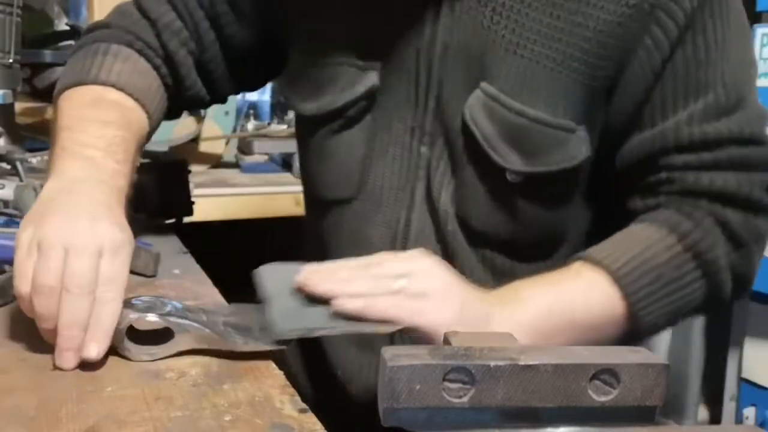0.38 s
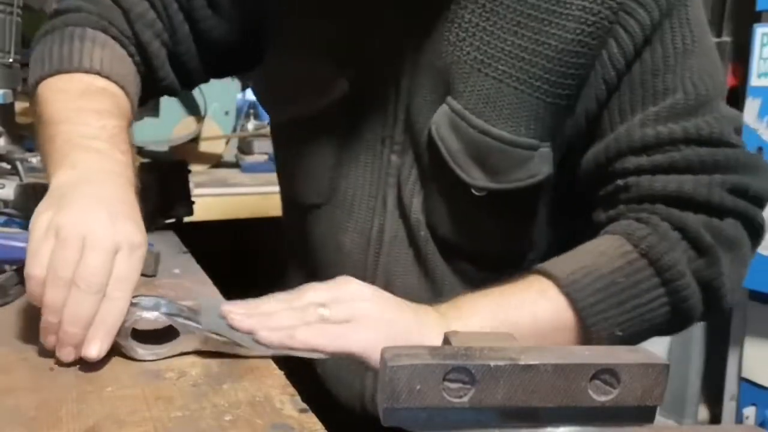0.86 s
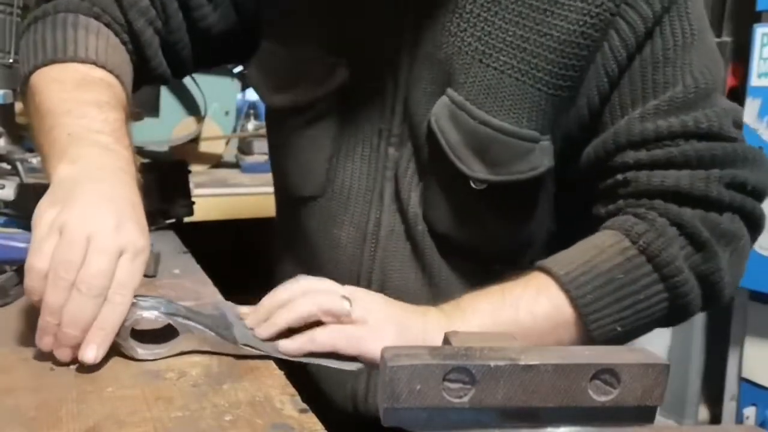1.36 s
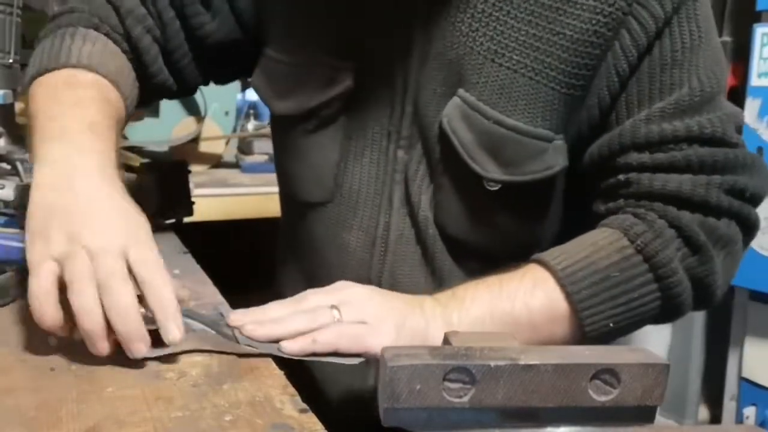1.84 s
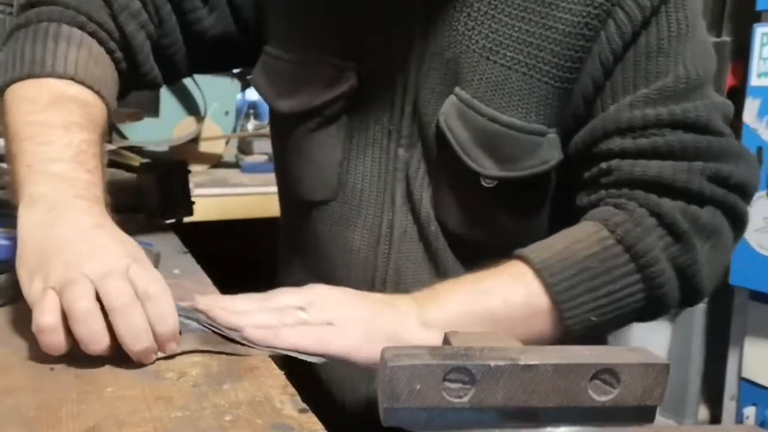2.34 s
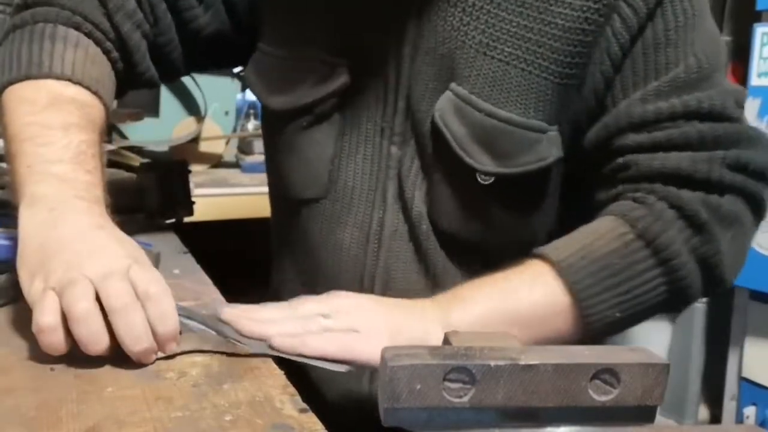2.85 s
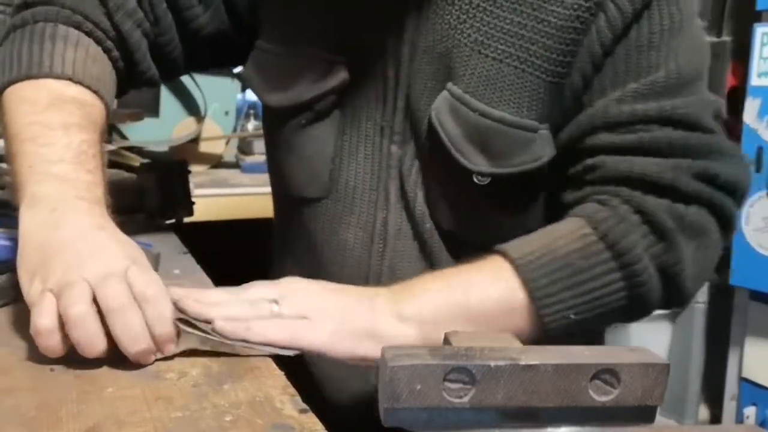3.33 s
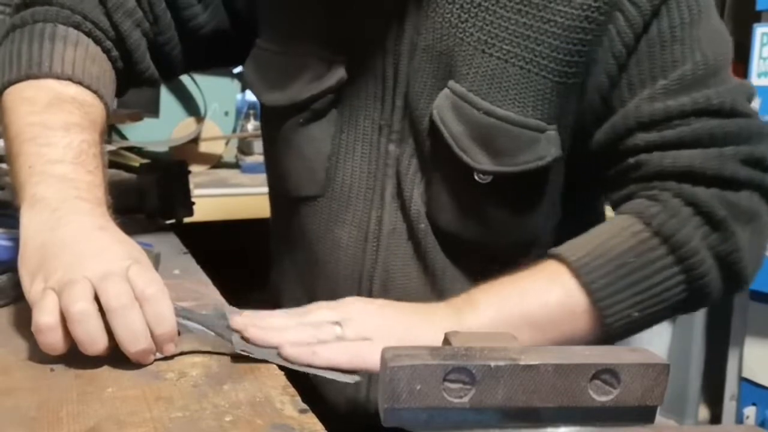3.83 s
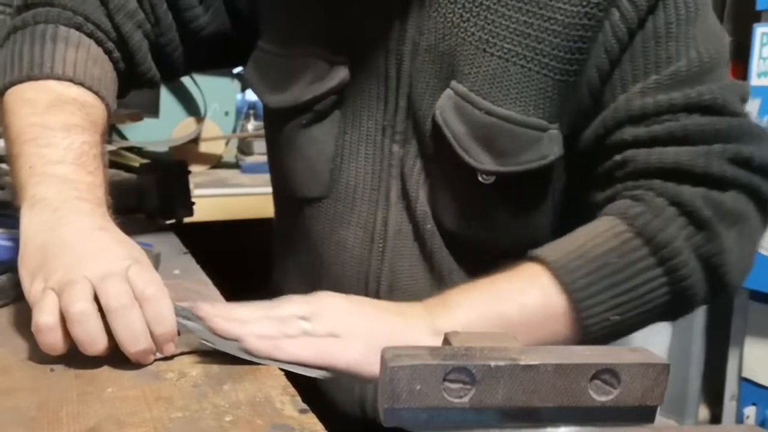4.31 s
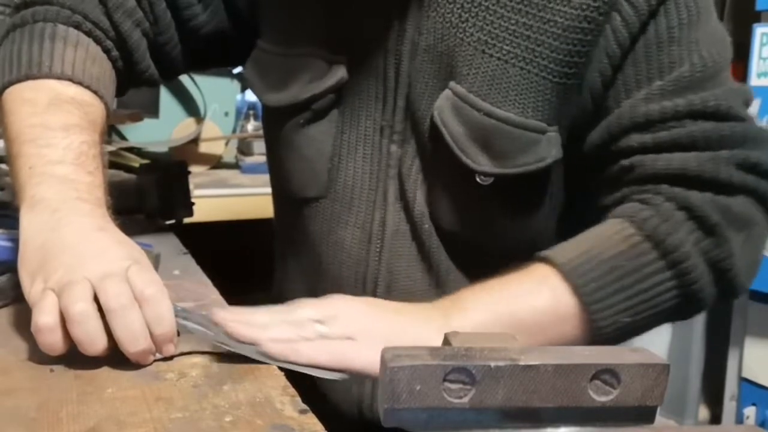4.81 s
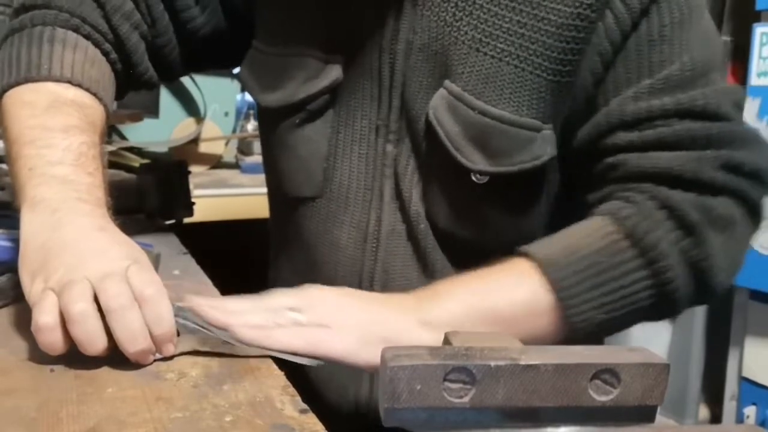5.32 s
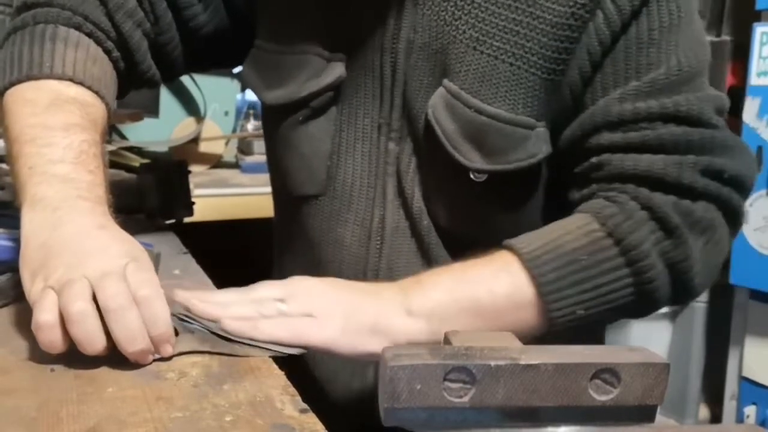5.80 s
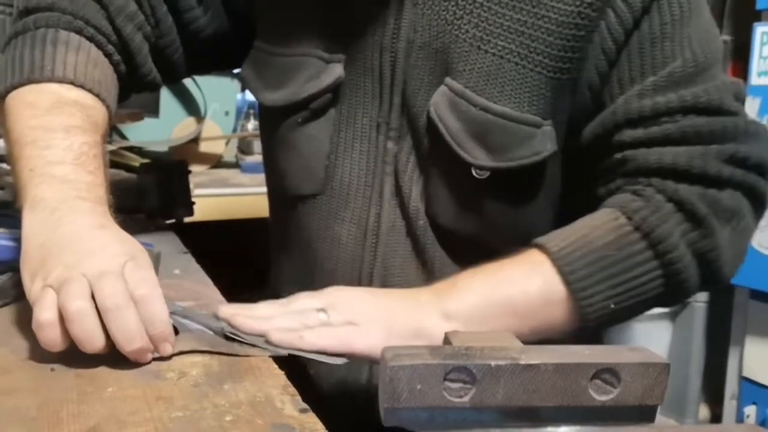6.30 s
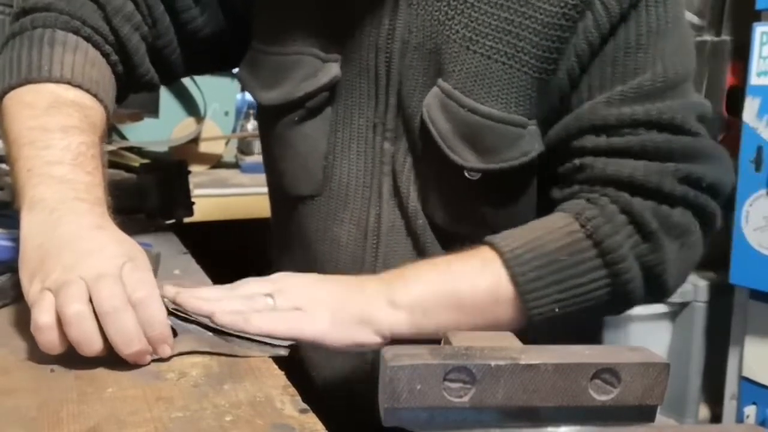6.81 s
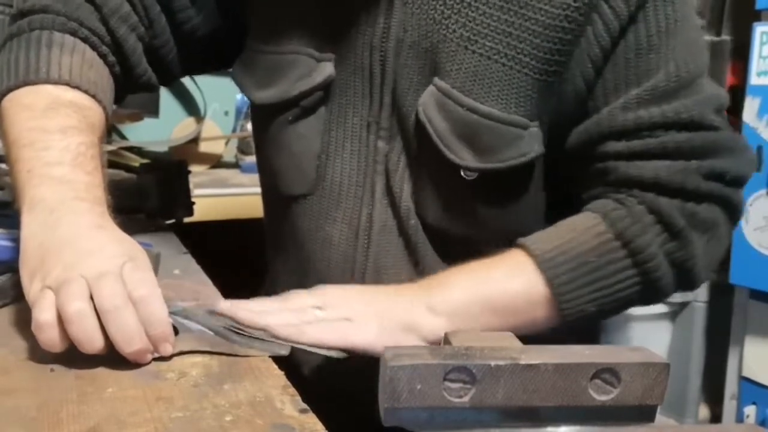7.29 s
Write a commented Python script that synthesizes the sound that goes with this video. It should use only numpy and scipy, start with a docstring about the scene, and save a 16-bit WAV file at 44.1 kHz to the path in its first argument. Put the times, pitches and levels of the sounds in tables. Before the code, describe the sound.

Close stereo sound in a small workshop with a short echo and barely audible air. At 0 s a light sandpaper brush fades with a soft knock; small scuffs follow around 0.5-0.75 s. From 0.8 to 1.5 s come four quick scratchy strokes on steel, each under 0.2 s. Rubbing stops; at 1.6-1.7 s two hard, woody knocks land close together, with a weaker tap just after and another knock at 2.05 s. From about 2.2 s the sanding runs steadily to the end at roughly 7.6 s, nearly six strokes a second, alternating push and pull, dipping at every turn. It combines bright gritty hiss, coarser scratch, damped metallic resonance and a low palm rasp, growing slightly fuller and less sharply separated. Moderate bench thuds recur irregularly, around 2.8, 3.1, 4.1, 4.5, 5.1, 5.5, 6.2 and 6.9 s, over a low wooden tremble.

```python
"""A light brush of sandpaper and a soft knock, a few quick strokes, a pause with hard knocks, then steady rubbing.
A palm rubs the sheet to and fro over a steel tool head on a wooden bench, close to a pair of microphone ports.
Random catches of grit are filtered into hiss, scratch, palm drag and ringing steel; each turn halts the paper.
The head knocks the bench: decaying modes boom and sway on the legs, and shaped noise trembles beneath.
A short decaying echo and faint airy noise place it all in a workshop."""
import sys
import numpy as np
from scipy import signal
from scipy.fft import rfft, irfft, next_fast_len
from scipy.io import wavfile
from scipy.ndimage import uniform_filter1d, map_coordinates

SR = 44100
rng = np.random.default_rng(int(sys.argv[2]) if len(sys.argv) > 2 else 0)


def linear_from_db(decibels):
    """Turn decibels (scalar or array-like) into linear amplitude factors; 0 gives 1."""
    return 10 ** (np.asarray(decibels, float) / 20)


def pcm_store(signal):
    """Save signal as 16-bit PCM."""
    levels = np.round(np.clip(np.atleast_2d(signal), -1, 1) * 32767)
    wavfile.write(sys.argv[1], SR, levels.astype(np.int16).T)


N = 337806
T = np.arange(N) / SR  # s


def unit(x):
    """Scales a sound to rms 1."""
    return x / np.sqrt(np.mean(x ** 2) + 1e-20)


def along(points, hz, axis=1):
    """Reads one column of a table on a log-frequency axis."""
    table = np.transpose(points)
    return np.interp(np.log(hz + 1), np.log(table[0] + 1), table[axis])


def curves(rows):
    """Draws each column after the time as a curve, one value per sample."""
    s, *columns = np.transpose(rows)
    return np.array([np.interp(T, s, column) for column in columns])


def wobble(rate):
    """A smooth random curve with rate knots a second."""
    knots = rng.standard_normal(int(N * rate / SR) + 4)
    return map_coordinates(knots, [T * rate])


def filtered(x, response):
    """Passes x through a complex response given as a function of frequency in Hz."""
    size = next_fast_len(N + SR // 2)
    hz = np.fft.rfftfreq(size, 1 / SR)
    return irfft(rfft(x, size) * response(hz), size)[..., :N]


def coloured(x, spectrum):
    """Shapes x by a table of hz and db, then scales it to rms 1: only the shape of the table counts."""
    return unit(filtered(x, lambda hz: linear_from_db(along(spectrum, hz))))


def sanding():
    """One stream of grit catches drives every layer of the rubbing, all under the same strokes."""
    grit_db, steel_db, scratch_db, dip_db, place = stroke_levels(
        sharp=2.26, reach=1.35, eager=0.93, steel_dip=0.46, edge_db=1.0)
    press_db = .35 * wobble(30) + .8 * wobble(150)  # the palm's pressure flutters
    grains = patchy(catches(rate=8000, spread_db=2.5, smooth=1.1), patchy_db=1.5)
    layers = grit(grains, grit_db + press_db) + scratch(grains, scratch_db + press_db)
    layers = layers + steel(grains, steel_db + press_db) + palm(grains, dip_db)
    return layers + tip(grains, grit_db + press_db, place)


# spectrum of the fine grit; columns: hz, relative_db
FINE_GRIT = [(3650, -37), (6200, -8), (7930, 3), (10100, -12.5), (15100, -21)]


def grit(grains, level_db):
    """Fine grit scraping steel: a bright hiss."""
    return linear_from_db(level_db - 2.0) * coloured(grains, FINE_GRIT)


# spectrum of the coarse grit; columns: hz, relative_db
COARSE_GRIT = [(1760, -39.5), (3000, -7), (3180, -17), (3900, -8), (4500, -1.5), (5400, -1.5), (6000, -3.5),
               (6800, -4.5), (8840, -29), (15000, -120)]


def scratch(grains, level_db):
    """Coarser grit: a scratch lower in pitch than the hiss."""
    return linear_from_db(level_db - 0.5) * coloured(grains, COARSE_GRIT)


# modes of the steel head, damped by the palm; columns: pitch_hz, width_hz, relative_db
STEEL_MODES = [(947, 50, -20), (1829, 40, -5), (1943, 38, -1.5), (2130, 60, -6), (2478, 60, -5),
               (2753, 25, -3), (3913, 50, -11), (4033, 70, -11), (4337, 30, -9), (4846, 70, -9),
               (5349, 55, -8), (5953, 30, -8), (6239, 35, -7)]
# spectrum of the sheet on the held head; columns: hz, relative_db
HELD_SHEET = [(760, -101), (1300, -19), (1600, -3), (1940, -0.5), (2120, 6.5), (2440, -2), (3300, -9.5),
              (4290, -35.5), (7260, -120)]
# spectrum of the sheet on the loose head; columns: hz, relative_db
LOOSE_SHEET = [(760, -19.5), (1300, -6.5), (1720, -9), (1950, -2), (2420, 1.5), (3100, -10), (3600, -6.5),
               (4680, -20), (7920, -120)]


def steel(grains, level_db):
    """Grains ring the head's resonances; a firmer grip moves from the loose sound to the held one."""
    def modes(hz):
        response = 0
        for k, (centre, width, db) in enumerate(STEEL_MODES):
            damping = 1j * hz * width
            response = response + (-1) ** k * linear_from_db(db) * damping / (centre ** 2 - hz ** 2 + damping)
        return response

    grip = np.clip(curves(HANDS)[0], 0, 1)
    ring = unit(filtered(grains, modes))
    held = linear_from_db(-3) * coloured(grains, HELD_SHEET) + linear_from_db(-3) * ring
    loose = linear_from_db(3.5) * coloured(grains, LOOSE_SHEET)
    return linear_from_db(level_db) * patchy(grip * held + (1 - grip) * loose, patchy_db=1.5)


# spectrum of the thin overhanging end under the sheet; columns: hz, relative_db
THIN_END = [(2900, -120), (3250, -13.5), (3600, -1), (4100, 2.5), (4600, -37), (6000, -120)]


def tip(grains, grit_db, place):
    """The thin end of the head sounds louder as the sheet nears it."""
    below_grit_db, swing_db = -22.5, 10.5
    return linear_from_db(grit_db + below_grit_db + swing_db * place) * coloured(grains, THIN_END)


# spectrum of the palm's drag; columns: hz, relative_db
PALM_DRAG = [(250, -5), (420, -3), (587, 1.5), (731, -3), (822, 5.5), (1130, -0.5), (1500, -15),
             (1950, -2.5), (3300, -120)]
# drag of the palm over the bench top's tremble, before dips and wobble; columns: time_s, level_db
PALM_OVER_TOP = [(0, 1.5), (.3, -7.5), (.62, 1.5), (.8, -12), (1.2, -6), (2.3, -2), (3, 1.5), (4.5, -4.5),
                 (6, -3.5), (7, -3), (7.6, 0)]


def palm(grains, dip_db):
    """The palm drags with a low rasp that follows the trembling top and sags a little at the turns."""
    drag_db = curves(BENCH_SHAKE)[1] + curves(PALM_OVER_TOP)[0]
    return linear_from_db(drag_db + 0.074 * dip_db + 3.1 * wobble(12)) * coloured(grains, PALM_DRAG)


# pull and push strokes by turns, before swell and trims; columns: start_s, grit_turn_db, grit_middle_db
STROKE_TURNS = [(0.821, -77, -35.5), (1.006, -65, -34.5), (1.181, -47, -36), (1.355, -72, -37),
                (1.534, -68, -53), (2.173, -52, -35), (2.4, -47.5, -34.5), (2.579, -52, -33),
                (2.752, -43.5, -33.5), (2.911, -45, -31), (3.08, -41, -32), (3.247, -48, -30),
                (3.419, -47, -33), (3.592, -46, -31.5), (3.76, -43, -33), (3.919, -53, -32),
                (4.104, -50, -34), (4.276, -48, -32), (4.458, -51, -33.5), (4.614, -52, -30.5),
                (4.777, -64, -32), (4.964, -44, -30), (5.133, -48.5, -33.5), (5.307, -45, -31),
                (5.48, -53, -33), (5.666, -46, -32), (5.839, -43.5, -33.5), (6.015, -46.5, -30),
                (6.189, -44, -33), (6.374, -45, -31.5), (6.53, -46, -33), (6.727, -41.5, -30.5),
                (6.896, -40, -32), (7.094, -43, -30.5), (7.259, -40.5, -31.5), (7.447, -42, -32),
                (7.617, -41, -31.5), (7.79, -45, -32)]
# the hands: grip on the head, swell of a push and fade of a pull, steel and scratch re grit before trims;
# columns: time_s, grip_0_to_1, swell_db, steel_db, scratch_db
HANDS = [(0.1, 0, -35, -9, -17), (.9, 0.37, -2, -5.5, -4.5), (1.3, 0.6, 1, -10, -9),
         (2.2, 0.92, 0.5, -6, -7), (2.7, 0.85, .5, -5, -3), (3.1, 0.93, 2.5, -8, -7.5),
         (3.8, 0.88, 1.2, -7, -4), (4.4, 0.8, 1.5, -6.5, 0), (5.0, 0.79, 2.5, -7.5, -4),
         (5.6, 0.68, 2.5, -6.5, -4), (6.2, 0.8, 4, -7, -3.5), (6.9, 0.94, 1.5, -8, -5),
         (7.6, 0.8, 1, -11, -4.5)]


def stroke_levels(sharp, reach, eager, steel_dip, edge_db):
    """Grit, steel, scratch and dip dB, and place on the head: loudness follows hand speed, halting at turns."""
    longest_s = .3  # a longer gap between turns is a pause
    pull_steel, pull_scratch = 0.45, .5  # a pull rings and scratches more, a push less: dB per dB of swell
    start, turn, middle = np.transpose(STROKE_TURNS)
    k = np.clip(np.searchsorted(start, T, "right") - 1, 0, len(start) - 2)
    length = start[k + 1] - start[k]
    u = np.clip((T - start[k]) / length, 0, 1)  # progress through the stroke
    _, swell, steel_re, scratch_re = curves(HANDS)
    top = middle[k] - (-1) ** k * swell * np.clip((u - .51) / 0.32, -.8, .8)
    # the hand picks up speed faster than it slows (eager < 1)
    speed = np.minimum(reach * np.abs(np.sin(np.pi * u ** eager)), 1)
    turn_db = np.where(u < .5, turn[k], turn[k + 1])
    still = linear_from_db(np.minimum(turn_db - top, 0)) ** 2  # power left at the turn
    dip = 10 * np.log10(still + (1 - still) * speed ** sharp)
    pull = swell * np.sin(np.pi * (k + u))
    place = np.cos(np.pi * (k + u))  # 1 = overhanging end, where the steel rings most
    steel_db = top + steel_dip * dip + edge_db * place + steel_re + pull_steel * pull
    scratch_db = top + dip + scratch_re + pull_scratch * pull
    pause = (T < start[0]) | (length > longest_s)
    return np.where(pause, brush_levels(), [top + dip, steel_db, scratch_db, dip, place])


# light brushes as the sheet is laid on and lifted off, steel re grit; rise and fall each span 20 dB;
# columns: peak_s, grit_peak_db, rise_s, fall_s, steel_db
LIGHT_BRUSHES = [(0.028, -38.5, 0.41, 0.112, -6.5), (.15, -56, 0.14, 0.082, 1.5), (.41, -65, 0.14, .3, -13),
                 (.49, -45, 0.041, 0.069, -6.5), (0.54, -41.5, 0.0098, 0.071, -4.5),
                 (0.628, -39, 0.15, 0.064, -6), (0.731, -41, 0.094, 0.14, -1.5),
                 (1.588, -47, 0.065, 0.048, 1), (1.7, -73.5, .3, .5, 2), (1.87, -73.5, 0.21, .09, 6),
                 (2.172, -59, 0.033, .05, -8)]


def brush_levels():
    """Levels between strokes: the loudest brush at each moment, or the sheet lying almost still."""
    resting_db, resting_steel_db, scratch_re_db = -80.5, 4.5, -1.5
    s, peak, rise, fall, steel_re = np.transpose(LIGHT_BRUSHES)[:, :, None]
    lag = T - s
    each = peak - 20 * np.where(lag < 0, -lag / rise, lag / fall)
    grit_db = np.maximum(each.max(0), resting_db)
    loudest_steel = steel_re[each.argmax(0), 0]
    steel_now = np.where(grit_db > resting_db, loudest_steel, resting_steel_db)
    steel_db = grit_db + uniform_filter1d(steel_now, size=900)
    return [grit_db, steel_db, grit_db + scratch_re_db, 0 * T, 0 * T]


def catches(rate, spread_db, smooth):
    """Grains catch at random, rate a second, a few harder, over a smooth hiss of the finest ones."""
    hardness = linear_from_db(spread_db * np.minimum(rng.exponential(size=N), 3))
    size = hardness * (rng.random(N) < rate / SR)
    clicks = unit(size * rng.standard_normal((2, N)))
    return unit(clicks + smooth * rng.standard_normal((2, N)))


def patchy(x, patchy_db):
    """Random patches of gain over time and frequency: the contact area keeps shifting."""
    z = signal.stft(x, nperseg=512)[2]
    field = rng.standard_normal(z.shape[1:])
    field = uniform_filter1d(uniform_filter1d(field, size=6, axis=0), size=8, axis=1)
    return signal.istft(z * linear_from_db(patchy_db * unit(field)), nperseg=512)[1][:, :N]


# knocks on the bench, sway re knock, hardness as a tilt about 227 Hz;
# columns: start_s, gain_db, sway_db, hardness_db_per_octave
BENCH_KNOCKS = [(0.041, -37, -9, 1), (0.449, -44, 5.5, -11.5), (1.272, -46, -18, -15.5),
                (1.596, -18.5, -13, 2.2), (1.666, -18, -5, 2.5), (1.738, -35.5, -12, -2),
                (2.051, -26.5, -4.5, -1), (2.757, -25.5, -2.5, 2), (3.085, -27, -0.5, 4.5),
                (3.452, -30.5, 5.5, 3.3), (4.098, -28.5, 1.5, 3.5), (4.469, -27, -2.5, 4),
                (4.805, -32, -13, 3.5), (5.142, -27.5, 3.5, 6), (5.504, -27.5, -3, -2),
                (6.2, -26.5, -0.5, 0), (6.693, -39.5, -7, 5), (6.909, -26, -1.5, -0.5),
                (7.376, -45, -6.5, -15)]
# modes of the bench top, before scatter and trims; columns: pitch_hz, level_db, t60_s
BENCH_TOP = [(138, -5, .35), (162, -4, .28), (195, -6, .12), (228, 2.5, .22), (258, -2.5, .13),
             (295, -3, .13), (393, -12, .12), (452, -14, .12), (571, -20, .1), (721, -20, .1),
             (797, -16, .08), (921, -20, .1), (1010, -22, .1), (1900, -34, .03)]
# the bench swaying on its legs, before scatter; columns: pitch_hz, level_db, t60_s, build_up_s
BENCH_LEGS = [(38, 5.5, 0.77, 0.11), (69.1, 0.5, 0.48, 0.051)]


def knocks(count=14):
    """Rings the bench top, with count weak short modes at random pitches to thicken the thud; legs build last."""
    out, t = np.zeros(N + SR), np.arange(SR // 2) / SR
    top, legs = np.array(BENCH_TOP), np.array(BENCH_LEGS)
    for s, db, sway_db, hard_db in BENCH_KNOCKS:
        thud_hz = 300 * 7 ** rng.random(count)
        luck = rng.standard_normal((len(legs) + len(top) + count, 2))  # every knock lands a little differently
        hz = np.r_[legs[:, 0], top[:, 0], thud_hz] * (1 + .015 * luck[:, 0])
        t60 = np.r_[legs[:, 2], top[:, 2], .8 * along(BENCH_TOP, thud_hz, axis=2)]
        level = np.r_[legs[:, 1] + sway_db, top[:, 1], along(BENCH_TOP, thud_hz) - 5]
        level = level + 2.5 * luck[:, 1]
        level = level + (hz > 100) * (hard_db * np.log2(hz / 227) - 5.0)
        build = np.r_[legs[:, 3], .6 / hz[len(legs):]]  # above the legs, a fraction of a cycle
        decay = np.log(1000) / t60
        rings = linear_from_db(level)[:, None] * np.exp(np.outer(2j * np.pi * hz - decay, t)).imag
        onset = 1 - np.exp(-(t / build[:, None]) ** 2)
        out[round(s * SR):][:len(t)] -= linear_from_db(db) * np.sum(onset * rings, axis=0)
    return out[:N]


# rubbing shakes the bench, levels before wobble; columns: time_s, legs_db, top_db
BENCH_SHAKE = [(0.04, -46, -48), (0.19, -55, -59.5), (0.42, -62, -77.5), (0.64, -34, -53.5),
               (0.8, -44.5, -69.5), (0.98, -44.5, -58), (1.43, -47.5, -58), (1.6, -41, -60.5),
               (1.69, -36, -53), (1.79, -33, -68), (1.9, -40, -79), (2.09, -67, -68), (2.22, -52, -54),
               (2.5, -53.5, -58.5), (2.98, -45, -57), (4.6, -43, -53.5), (4.91, -34, -59),
               (5.21, -44, -55.5), (5.7, -40.5, -59.5), (6.7, -41.5, -56), (6.93, -41, -56),
               (7.3, -46.5, -55), (7.66, -40.5, -55.5)]
# spectrum of the swaying legs; columns: hz, relative_db
LEG_SWAY = [(11, -13), (18, 7), (32, 0.5), (46, -1.5), (81, -8), (102, -25.5), (110, -20.5), (140, -59),
            (240, -120)]
# spectrum of the rattling top; columns: hz, relative_db
TOP_RATTLE = [(59, -47), (100, 0), (135, 3), (247, -3), (280, 3.5), (397, -2.5), (480, -9), (620, -54),
              (1060, -120)]


def shaking():
    """The push of the hand keeps the bench legs and top trembling, as two bands of noise."""
    legs_db, top_db = curves(BENCH_SHAKE)
    legs = linear_from_db(legs_db + .8 * wobble(6)) * coloured(rng.standard_normal((2, N)), LEG_SWAY)
    top = linear_from_db(top_db + 1.8 * wobble(9)) * coloured(rng.standard_normal((2, N)), TOP_RATTLE)
    return legs + top


# decay of the workshop's echo; columns: hz, t60_s
SHOP_DECAY = [(200, 0.21), (2000, 0.1), (8000, 0.15), (15000, 0.095)]


def shop(x):
    """The walls answer with a tail of noise; each frequency dies at its own speed."""
    hz, t, z = signal.stft(rng.standard_normal((2, SR // 2)), SR, nperseg=256)
    fade = linear_from_db(-60 * t / along(SHOP_DECAY, hz)[:, None])
    tail = signal.istft(z * fade, SR, nperseg=256)[1]
    return signal.fftconvolve(x, tail / np.linalg.norm(tail[0]), axes=1)[:, :N]


# spectrum of the workshop air; columns: hz, relative_db
SHOP_AIR = [(150, -40), (300, 5), (480, -2), (980, -10), (3850, -4), (7730, -8), (10400, -18), (15500, -22)]


def shop_air():
    """Faint coloured noise whose level drifts slightly."""
    return linear_from_db(-72 + 0.4 * wobble(5.15)) * coloured(rng.standard_normal((2, N)), SHOP_AIR)


# likeness and phase of left and right in the stereo image; columns: hz, likeness_0_to_1, left_lead_rad
STEREO_LIKENESS = [(60, .99, 0.01), (217, 0.93, 0.41), (318, 0.64, 1.57), (635, 1, 1.8), (750, 0.33, 2.4),
                   (900, 0, 0.37), (1280, 0.93, 1.7), (1820, 1, 0.98), (2460, 1, 1.62), (3450, 0.66, 1.49),
                   (5000, 0, 3.7), (6700, 0.39, 3.5), (7140, 1, .1), (9200, 0.61, .01), (9500, 0.05, .01),
                   (15000, 0.1, .01)]
# balance of left and right; columns: hz, left_over_right_db
STEREO_LEAN = [(60, 0.5), (110, 1), (200, 0.5), (380, 0.5), (700, 6), (1290, 1.5), (2380, 1.5), (4400, 2.5),
               (8120, 4), (15000, 15)]


def stereo_image(pair):
    """Mixes two versions of a sound to the likeness, phase and balance of left and right."""
    def spread(hz):
        turn = np.arccos(np.clip(along(STEREO_LIKENESS, hz), 0, 1)) / 2
        return np.array([np.cos(turn), np.sin(turn)])

    def offset(hz):
        half = linear_from_db(along(STEREO_LEAN, hz) / 2) * np.exp(.5j * along(STEREO_LIKENESS, hz, axis=2))
        return np.array([half, 1 / half])

    mid, side = filtered(pair, spread)
    return filtered(np.array([mid + side, mid - side]), offset)


def scene():
    """Everything on the bench, its echo and the air of the shop, in stereo."""
    rasp, blows = sanding(), knocks()
    echo = shop(linear_from_db(-11.5) * rasp + linear_from_db(-19) * blows)
    direct_blows = blows * [[1], [0]]  # one version only: left and right differ just in phase and balance
    return stereo_image(rasp + direct_blows + echo + shaking() + shop_air())


def top_cut(x):
    """Nothing passes above the cut-off."""
    return signal.sosfilt(signal.butter(12, 16400, fs=SR, output="sos"), x)


def record(dry):
    """Cuts everything from 15250 Hz up and adds a small constant offset."""
    mix = filtered(dry, lambda hz: hz < 15250) - .0006
    return top_cut(mix)


dry = scene()
out = record(dry)
pcm_store(out)
```